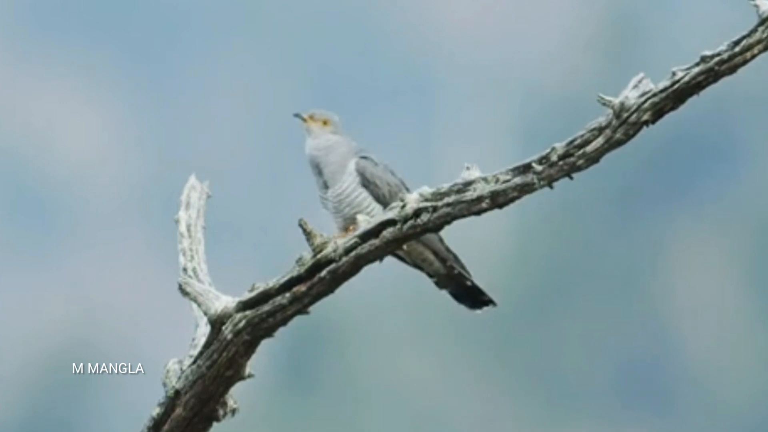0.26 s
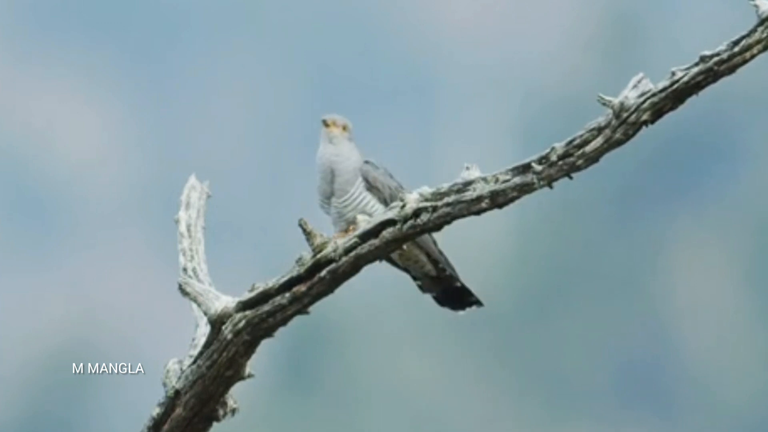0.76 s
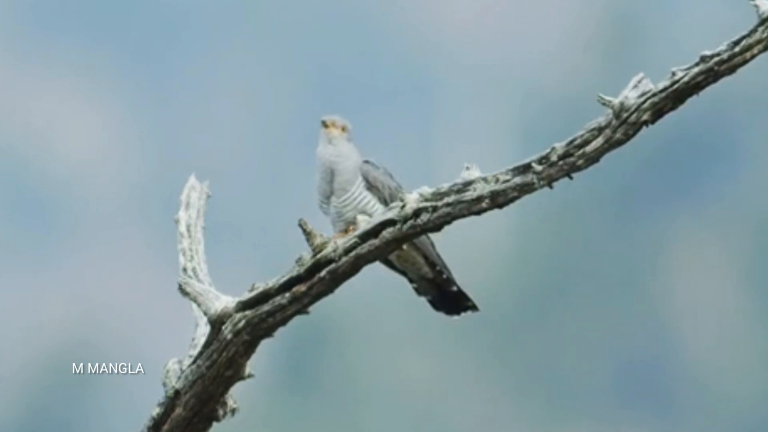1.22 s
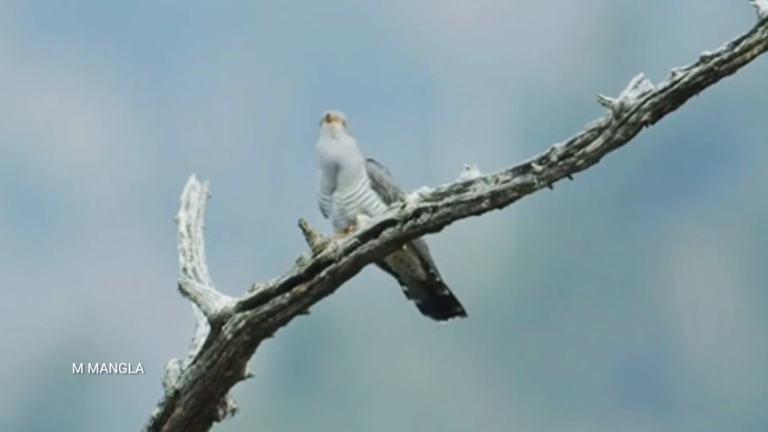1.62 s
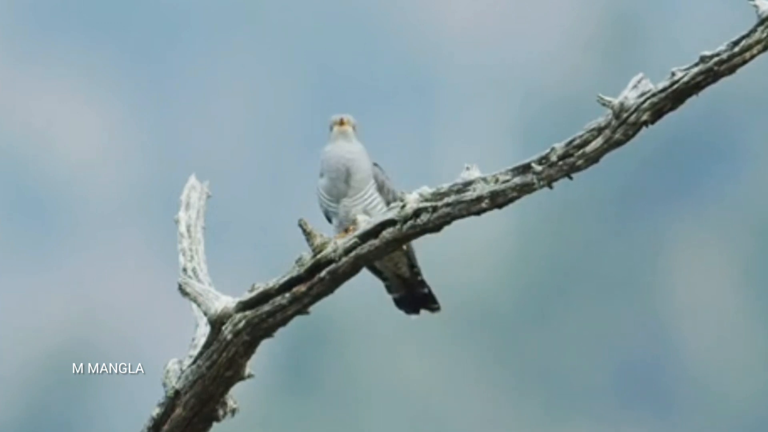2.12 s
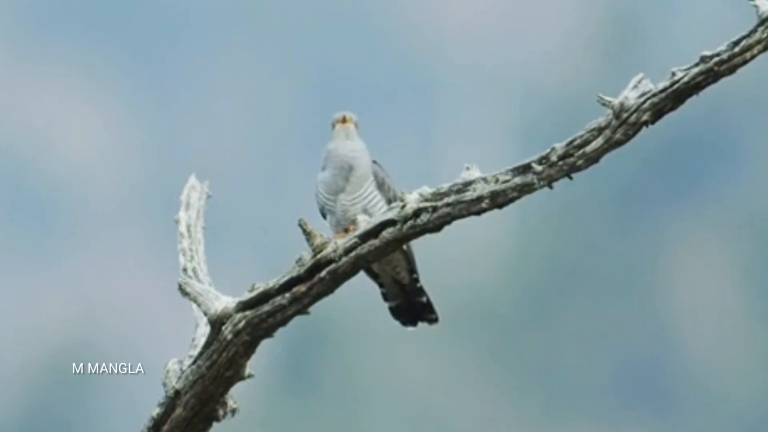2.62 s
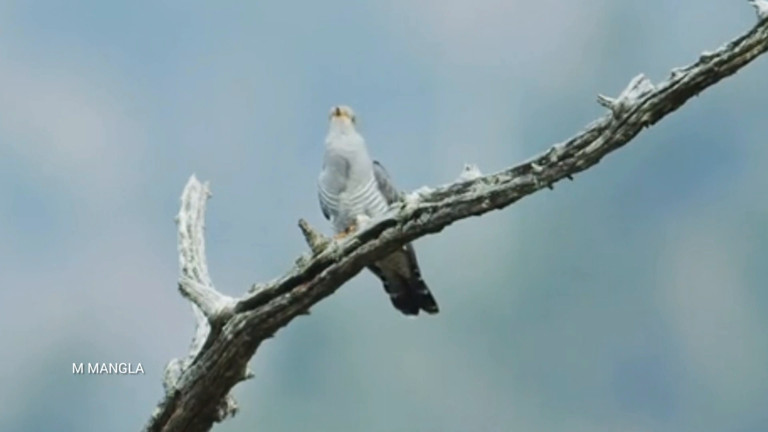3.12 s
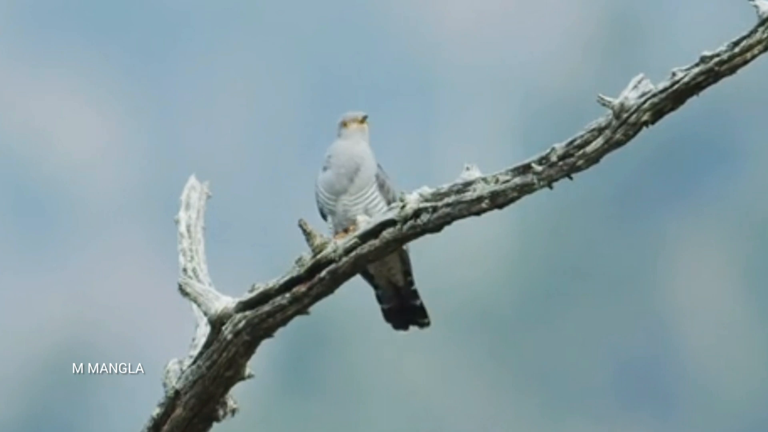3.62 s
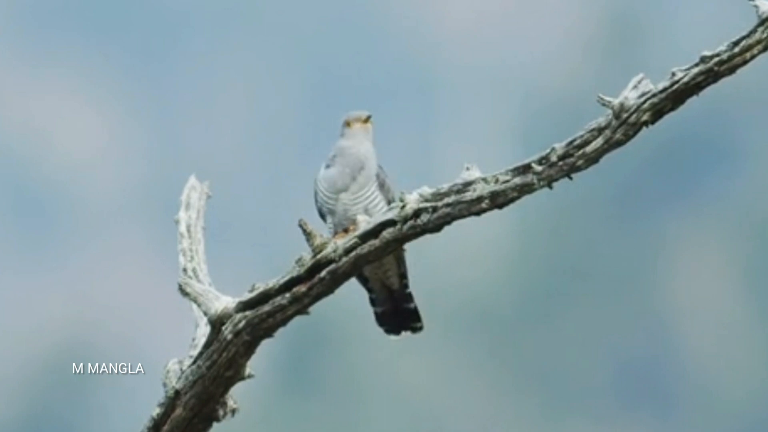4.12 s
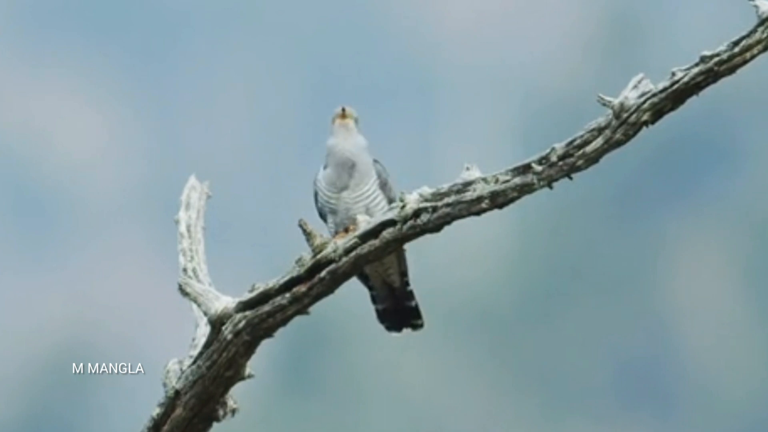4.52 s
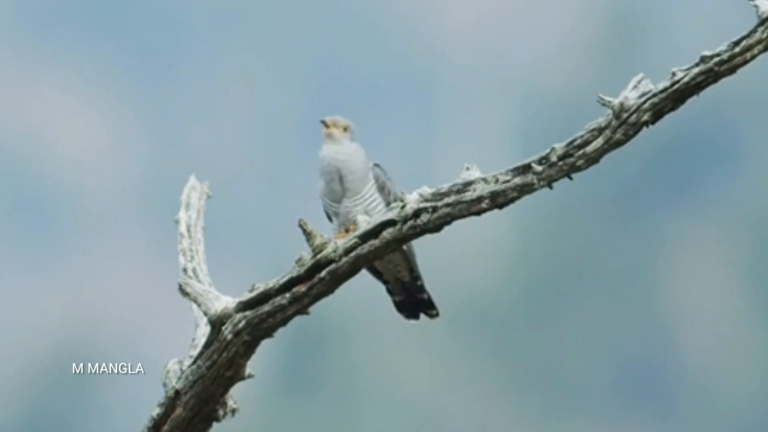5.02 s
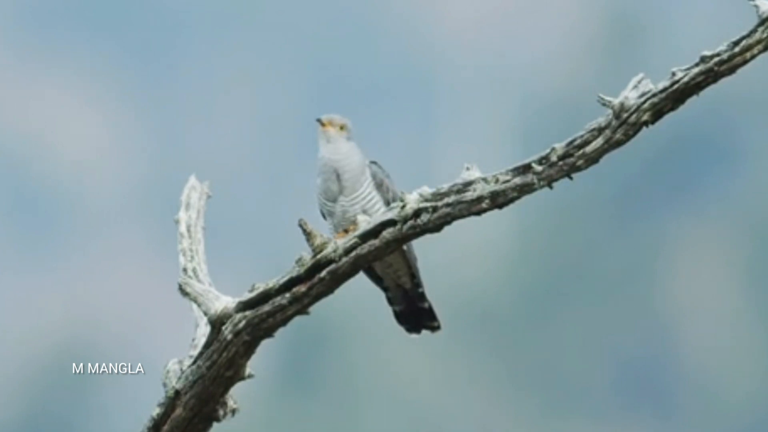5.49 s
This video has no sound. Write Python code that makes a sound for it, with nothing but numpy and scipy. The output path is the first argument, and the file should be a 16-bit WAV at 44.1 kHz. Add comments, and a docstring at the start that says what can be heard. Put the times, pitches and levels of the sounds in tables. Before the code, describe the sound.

Outdoors in a calm, open valley, a mono microphone picks up a clear cuckoo repeating its falling two-note hoot four times, with a slightly longer wait after the first call. Trees return a dim, blurred echo. Behind it are very faint high whistles and warbles of small birds, one dry twig tick, soft airy murmur and a barely felt low breeze rumble.

```python
"""A cuckoo calls its falling two notes four times, and trees and a far slope send them back.
Each hoot is a gliding, nearly pure sine with faint overtones; its echoes are delayed copies and a scattered tail.
Small songbirds whistle faintly further off as thin sliding sines, over blurred warbling drawn by chance.
A twig snaps once as a cluster of short modes; below it all lie shaped noise for the valley's air and
microphone hiss, and a low breeze rumble."""
import sys
import numpy as np
from scipy import signal
from scipy.fft import rfft, irfft, next_fast_len
from scipy.io import wavfile
from scipy.ndimage import uniform_filter1d, map_coordinates

SR = 44100
rng = np.random.default_rng(int(sys.argv[2]) if len(sys.argv) > 2 else 0)


def bounce(signal):
    """Save signal as a 16-bit WAV file at the path given by the first command-line argument."""
    frames = np.transpose(np.atleast_2d(signal))
    limited = np.clip(frames, -1, 1)
    pcm = np.round(limited * 32767).astype(np.int16)
    wavfile.write(sys.argv[1], SR, pcm)


N = 253575

# Cuckoo notes, high and low in turn: (time [s], length [s], top pitch [Hz], level [dB], swell start to end [dB],
# lateness of the swing [exponent], lift of partials 2 and 3 [dB], echo lift: wood's edge [dB], far slope [dB])
CALL_NOTES = [(.2054, .1002, 785, -15.6, 3.9, .99, 4, -6, -6),
              (.5535, .1602, 610, -21.1, 2.5, .98, 1, 7, -3),
              (1.879, .1074, 785, -14.2, -2.7, 1.07, 0, -5, -5),
              (2.2378, .1531, 617, -21.3, 1.7, .89, -.5, 0, .5),
              (3.2335, .1126, 797, -14.6, -2.2, 1.02, -3, 0, 1),
              (3.5962, .1535, 619.5, -21.8, -.8, 1.07, -.5, 2, .5),
              (4.7481, .1099, 796, -14.8, 1, .92, -1, 2, 3),
              (5.1174, .1599, 615, -22.1, -3.4, 1.06, 0, 1, -3)]
# Shape of the high and the low note: (share of length [0-1], drop below top pitch [Hz], share of full swing [0-1])
HIGH_NOTE_SHAPE = [(0, 153, 0), (.055, 136, .135), (.158, 40, .57), (.348, 31, .79), (.545, 0, 1),
                   (.7, 55, .91), (.81, 96, .69), (.915, 133, .22), (1, 148, 0)]
LOW_NOTE_SHAPE = [(0, 8, 0), (.068, 11, .47), (.166, 7, .97), (.36, 0, .95), (.665, 3, 1), (.84, 2, .82),
                  (.93, 11, .45), (1, 29, 0)]
# Overtones before each note's lift, fade and wobble: (multiple of the fundamental [-], level against it [dB])
HIGH_NOTE_OVERTONES = [(2, -46), (3, -51), (4, -57), (5, -56)]
LOW_NOTE_OVERTONES = [(2, -36), (3, -41.5), (4, -49), (5, -48), (6, -54)]

# Reflections off near trunks: (delay [s], level [dB])
TRUNK_ECHOES = [(.0449, -25.5), (.0589, -31.5), (.097, -30), (.1492, -31)]
# Reflections off the wood's edge and the far slope, before each note's lift: (delay [s], level [dB])
EDGE_ECHOES = [(.2, -40), (.2401, -34.5), (.3259, -38.5)]
SLOPE_ECHOES = [(.41, -31.5), (.47, -31), (.52, -36), (.72, -40)]
# Dying away of the scatter among the trees: (frequency [Hz], t60 [s])
TREE_DECAY = [(400, 1.43), (1000, 1.2), (5000, 0.63)]

# Thin sliding tones, songbird whistles and one cuckoo partial, levels before they are broken up:
# (time [s], length [s], start pitch [Hz], middle pitch [Hz], end pitch [Hz], rms level [dB])
SLIDING_TONES = [(.67, 0.062, 3630, 3600, 3460, -60.5), (.83, .03, 5220, 4850, 4590, -60),
                 (.86, 0.036, 4560, 4570, 4740, -56.5), (.9, .05, 4600, 4620, 4680, -67),
                 (.998, 0.019, 5250, 4700, 5500, -60), (1.014, .042, 5470, 5660, 5550, -58),
                 (1.117, 0.029, 4150, 4170, 4240, -60), (1.162, .014, 3250, 3080, 2880, -55.5),
                 (1.2, .05, 2470, 2430, 2440, -66), (1.203, 0.011, 4200, 4220, 4250, -63),
                 (1.26, .11, 2000, 2000, 2020, -67), (1.269, .014, 5200, 4900, 4800, -64),
                 (1.293, 0.0052, 4100, 3850, 3680, -59), (1.299, 0.014, 3650, 3630, 3640, -51.5),
                 (1.39, .09, 1990, 1990, 1990, -64), (1.52, 0.097, 2010, 1990, 2030, -65),
                 (1.642, .04, 1950, 2680, 2130, -59), (1.705, 0.016, 3550, 3500, 3350, -58),
                 (1.752, .016, 2650, 2450, 2210, -59), (1.768, 0.02, 2120, 2133, 2130, -49.5),
                 (1.775, 0.16, 5220, 5270, 5180, -64.5), (1.79, 0.038, 2210, 3200, 3520, -61),
                 (1.92, .05, 2120, 2170, 2060, -62), (1.965, 0.041, 3190, 2710, 1940, -55),
                 (2.05, .035, 5300, 5270, 5200, -68), (2.545, .04, 4030, 4130, 4100, -63),
                 (2.56, .02, 3580, 3400, 3150, -66), (2.615, .1, 3200, 2740, 2470, -68),
                 (2.72, .06, 4880, 4920, 4920, -68), (2.98, .03, 2630, 2700, 2350, -60),
                 (3.15, .045, 4970, 4300, 3940, -55.5), (3.21, 0.04, 1720, 1740, 1680, -57.5),
                 (3.335, 0.03, 2540, 2590, 2740, -53.5), (3.36, 0.024, 2740, 2060, 1840, -55.5),
                 (3.385, 0.09, 1830, 1830, 1840, -58), (3.53, 0.032, 1914, 2310, 1890, -53.5),
                 (3.58, 0.11, 2230, 2290, 2300, -67), (4.79, 0.028, 3820, 4000, 4080, -64),
                 (4.97, 0.1, 4570, 4440, 4490, -65), (5.0, 0.041, 4070, 3800, 3630, -59),
                 (5.01, 0.032, 1980, 1950, 2050, -58), (5.14, 0.12, 4160, 4560, 4820, -59),
                 (5.24, 0.027, 4700, 4650, 4750, -64), (5.27, .03, 1870, 1800, 1620, -56.5),
                 (5.29, .13, 5100, 4580, 4370, -57), (5.536, 0.14, 3430, 3330, 3340, -57),
                 (5.6, 0.1, 3550, 3630, 3650, -65), (5.664, .018, 5320, 5310, 5290, -64),
                 (5.73, .016, 4480, 4480, 4530, -60)]
# Brief fifth partial of the fourth call's high note, same columns
CUCKOO_FIFTH_PARTIAL = [row for row in SLIDING_TONES if row[0] == 4.79]
# All the other rows are songbirds, same columns
SONGBIRD_WHISTLES = [row for row in SLIDING_TONES if row[0] != 4.79]
# Bouts of far warbling: (start [s], end [s], lowest middle pitch [Hz], highest middle pitch [Hz], mid level [dB])
WARBLE_BOUTS = [(1.129, 1.34, 2300, 4400, -66.5), (1.64, 2.162, 1788, 3730, -65.5),
                (2.461, 2.602, 3000, 4090, -67), (3.2, 3.603, 1510, 2600, -67),
                (4.762, 5.36, 1690, 4600, -68)]

# Ringing modes of the snapped twig: (frequency [Hz], level [dB], t60 [s])
TWIG_MODES = [(1650, -39, .015), (3950, -41, .018), (4750, -29, .008), (6200, -44, .01), (8050, -41, .014),
              (9700, -41, .016)]

# Colour of the air murmur and hiss: (frequency [Hz], relative density [dB per Hz])
AIR_COLOUR = [(15, -30), (25, -14.5), (136, -18), (273, -5.5), (596, -3.5), (719, -4), (1410, -12.5),
              (1570, -17), (1940, -20.5), (2220, -21.5), (15400, -26)]
# Colour of the breeze rumble: (frequency [Hz], relative density [dB per Hz])
RUMBLE_COLOUR = [(15, -0.5), (30, 14), (60, -12), (110, -29), (200, -56)]
# Course of the breeze rumble, before its unsteadiness: (time [s], level [dB])
BREEZE_LEVEL = [(0, -69), (.9, -75), (2.5, -74), (4.13, -73), (4.55, -64.5), (5.2, -75), (5.75, -70)]


def cuckoo():
    """Each note arrives direct, off near trunks, the wood's edge and the far slope, with a faint scatter between."""
    out = np.zeros(N)
    high = (HIGH_NOTE_SHAPE, HIGH_NOTE_OVERTONES)
    low = (LOW_NOTE_SHAPE, LOW_NOTE_OVERTONES)
    kinds = [high, low] * len(CALL_NOTES)
    for (start_s, *voice, edge_db, slope_db), kind in zip(CALL_NOTES, kinds):
        hoot = note(*kind, *voice)
        add(out, start_s, hoot)
        for echoes, lift_db in ((TRUNK_ECHOES, 0), (EDGE_ECHOES, edge_db), (SLOPE_ECHOES, slope_db)):
            for delay_s, echo_db in echoes:
                add(out, start_s + delay_s, amp(echo_db + lift_db) * hoot)
        add(out, start_s, amp(-35) * trees(hoot, start_s=.1, rise_s=.25))
    return out + sliding(CUCKOO_FIFTH_PARTIAL, scatter_hz=25, break_db=2, room_db=-11)


def note(shape, overtones, length_s, top_hz, db, swell_db, late, bright_db):
    """One hoot: an almost pure tone from the swollen throat; the faint overtones come and go."""
    overtone_fade_db = 14  # the second partial weakens by this much through a note
    share, below_hz, swing = np.transpose(shape)
    u = np.linspace(0, 1, round(length_s * SR))

    def smooth(values, at):
        return uniform_filter1d(np.interp(at, share, values), size=160)

    hz = top_hz - smooth(below_hz, u) + 1.33 * wobble(60)[:len(u)]
    phase = 2 * np.pi * np.cumsum(hz) / SR
    voice = np.sin(phase)
    for multiple, tone_db in overtones:
        tone_db = tone_db + bright_db * (multiple < 4) + 4 * wobble(40)[:len(u)]
        tone_db = tone_db - overtone_fade_db * (multiple == 2) * (u - .5)
        voice = voice + amp(tone_db) * np.sin(multiple * phase)
    level = amp(db + swell_db * (u - .5) + 0.19 * wobble(63)[:len(u)])
    return level * smooth(swing, u ** late) * voice


def trees(x, start_s, rise_s):
    """Scattered sound that builds up and then dies, each frequency at its own speed."""
    hz, t, noise = signal.stft(rng.standard_normal(SR), SR, nperseg=256)
    decay = amp(-60 * t / along(TREE_DECAY, hz)[:, None])
    tail = signal.istft(noise * (1 - np.exp(-t / rise_s)) * decay, SR, nperseg=256)[1]
    delayed = np.pad(x, (round(start_s * SR), 0))
    return signal.fftconvolve(delayed, tail / np.linalg.norm(tail))


def songbirds():
    """Clear whistles and a trill, over blurred warbling further off."""
    trill_s, trill_step_s = 5.712, 0.017
    chip = (.012, 3030, 3650, 2950, -53.5)  # arched pitch; columns as in the whistles, without the time
    trill = [(trill_s + k * trill_step_s, *chip) for k in range(3)]
    near = sliding(SONGBIRD_WHISTLES + trill, scatter_hz=25, break_db=2, room_db=-11)
    far = sliding(warbling(), scatter_hz=180, break_db=2.5, room_db=-2)
    return near + far


def sliding(rows, scatter_hz, break_db, room_db):
    """Thin sliding tones, made unsteady in pitch and level and blurred by scatter among the trees."""
    out = np.zeros(N + SR)
    tremor = np.pad(unit(wobble(260)), (0, SR))
    for start_s, length_s, start_hz, middle_hz, end_hz, db in rows:
        u = np.linspace(0, 1, round((length_s + 0.0039) * SR))  # room for the soft ends
        # parabola through the three pitches
        hz = start_hz * (1 - u) * (1 - 2 * u) + 4 * middle_hz * u * (1 - u) + end_hz * u * (2 * u - 1)
        hz = hz + scatter_hz * tremor[round(start_s * SR):][:len(u)]
        swell = np.sin(np.pi * u) ** 0.28
        tone = np.sin(2 * np.pi * np.cumsum(hz) / SR)
        add(out, start_s - .002, np.sqrt(2) * amp(db) * swell * tone)
    out = out[:N] * amp(break_db * wobble(50))  # moving air and leaves break up the level
    return out + amp(room_db) * trees(out, start_s=.01, rise_s=.01)[:N]


def warbling():
    """Whistle rows drawn by chance: short notes sliding at random around middle pitches in each bout's range."""
    notes_per_s, base_length_s = 60, .018
    slide = 0.13  # greatest shift of start and end pitch, as a share of the middle pitch
    rows = []
    for start_s, end_s, low_hz, high_hz, db in WARBLE_BOUTS:
        count = round((end_s - start_s) * notes_per_s)
        for when, pitch, length, slide_in, slide_out, loudness in rng.random((count, 6)):
            hz = low_hz * (high_hz / low_hz) ** pitch
            rows.append((start_s + when * (end_s - start_s),
                         base_length_s * (.5 + length),
                         hz * (1 + slide * (2 * slide_in - 1)),
                         hz,
                         hz * (1 + slide * (2 * slide_out - 1)),
                         db + 6 * (loudness - .5)))
    return rows


def twig():
    """One dry snap: short modes struck together."""
    snap_s = 2.6
    out = np.zeros(N)
    t = np.arange(SR // 20) / SR
    ring = sum(amp(db - 60 * t / t60) * np.sin(2 * np.pi * hz * t) for hz, db, t60 in TWIG_MODES)
    add(out, snap_s, ring * (1 - np.exp(-t / .0002)))
    return out + amp(-15) * trees(out, start_s=0.0015, rise_s=.002)[:N]


def air():
    """Far leaves, water and microphone hiss in faint patches; the breeze rumbles on the microphone port."""
    grains = signal.stft(rng.standard_normal(N + 512), nperseg=512)[2]
    # patches: random levels smoothed over frequency, then over time
    patches = uniform_filter1d(rng.standard_normal(grains.shape), size=6, axis=0)
    patches = uniform_filter1d(patches, size=10, axis=1)
    patchy = signal.istft(grains * amp(1.36 * unit(patches)), nperseg=512)[1][:N]
    murmur = amp(-49.5) * unit(filtered(patchy, lambda hz: amp(along(AIR_COLOUR, hz))))

    rumble = unit(filtered(rng.standard_normal(N), lambda hz: amp(along(RUMBLE_COLOUR, hz))))
    rumble_db = np.interp(np.arange(N) / SR, *np.transpose(BREEZE_LEVEL))
    return murmur + amp(rumble_db + 2.7 * wobble(3.8)) * rumble


def amp(db):
    """Gain of a level in dB."""
    return 10 ** (np.asarray(db) / 20)


def unit(x):
    """x at rms 1."""
    return x / np.sqrt(np.mean(x ** 2))


def along(points, hz):
    """Values read off (frequency [Hz], value) points on a log axis."""
    f, v = np.transpose(points)
    return np.interp(np.log(hz + 1), np.log(f + 1), v)


def wobble(rate):
    """A smooth random curve, rate knots a second."""
    knots = rng.standard_normal(int(N * rate / SR) + 4)
    return map_coordinates(knots, [np.arange(N) * rate / SR])


def filtered(x, response):
    """x times a response of frequency."""
    m = next_fast_len(N + 8192)
    return irfft(rfft(x, m) * response(np.fft.rfftfreq(m, 1 / SR)), m)[..., :N]


def add(track, start_s, sound):
    """Mix a sound into the track from a start time."""
    part = track[round(start_s * SR):][:len(sound)]
    part += sound[:len(part)]


def scene():
    """All sources at one microphone."""
    return (cuckoo() + songbirds() + twig() + air())[None]


def record(dry):
    """Nothing is kept above the band limit."""
    top_hz = 15500
    return filtered(dry, lambda hz: hz < top_hz)


dry = scene()
out = record(dry)
bounce(out)
```